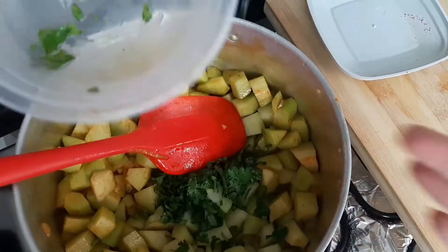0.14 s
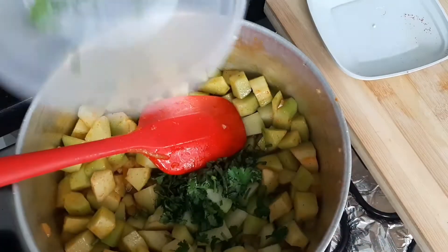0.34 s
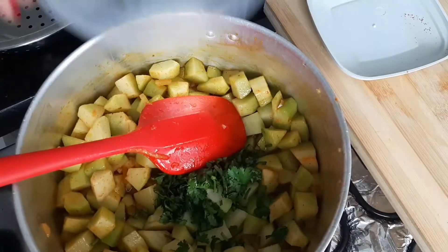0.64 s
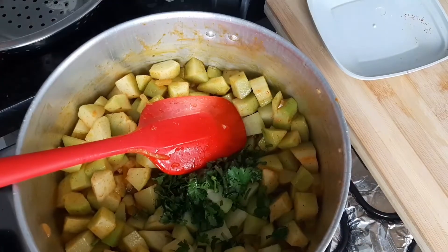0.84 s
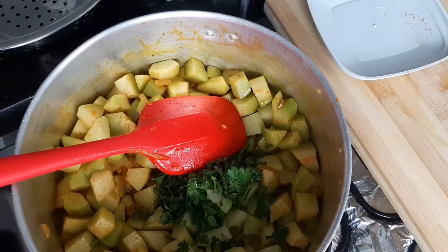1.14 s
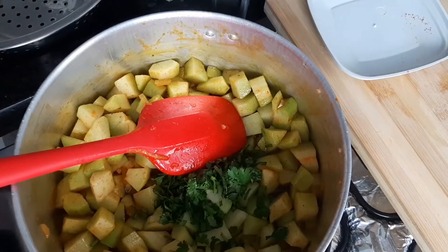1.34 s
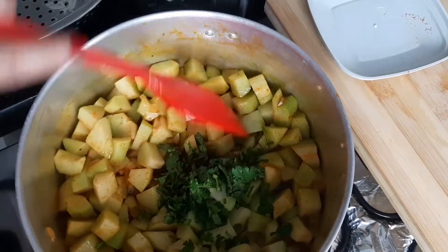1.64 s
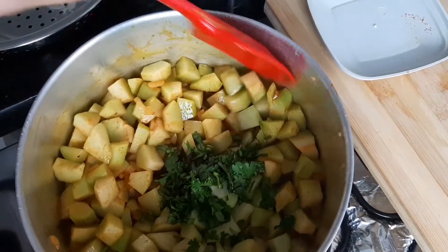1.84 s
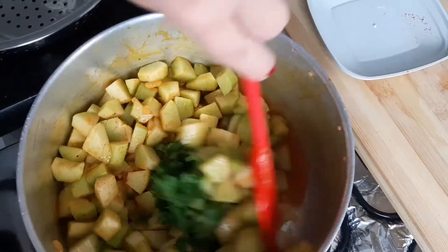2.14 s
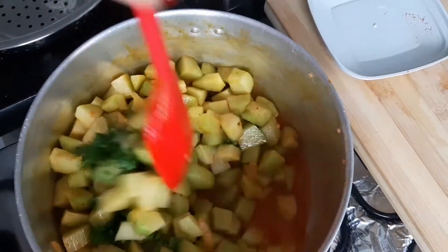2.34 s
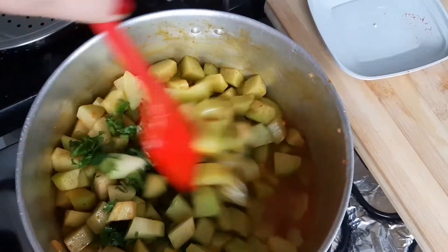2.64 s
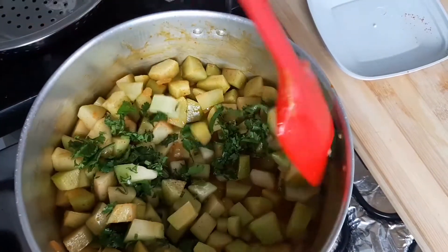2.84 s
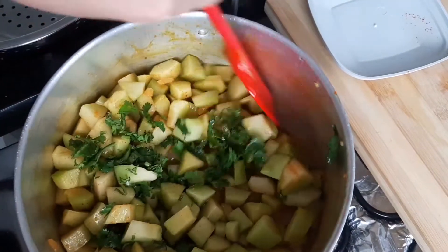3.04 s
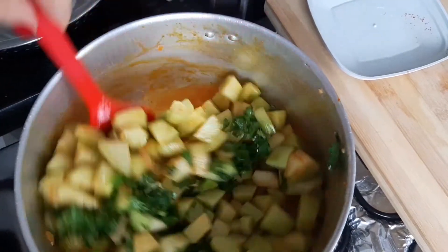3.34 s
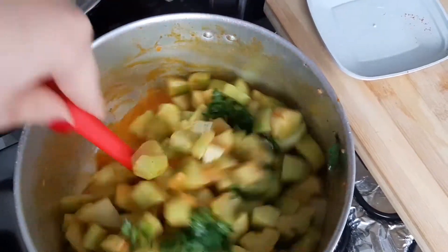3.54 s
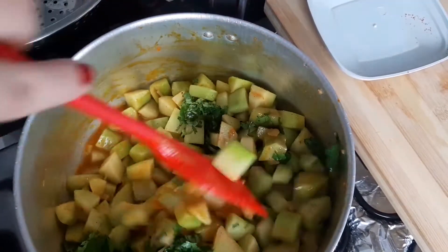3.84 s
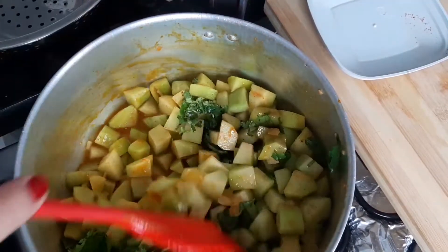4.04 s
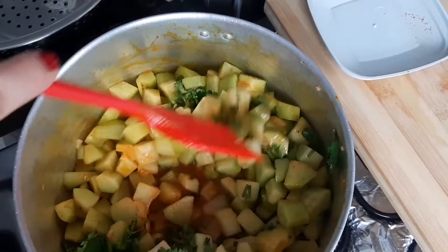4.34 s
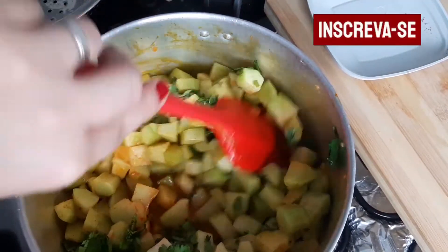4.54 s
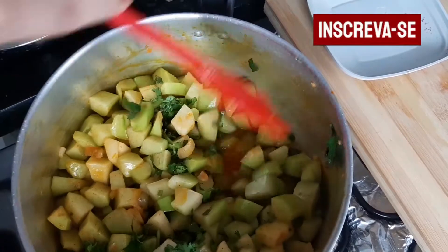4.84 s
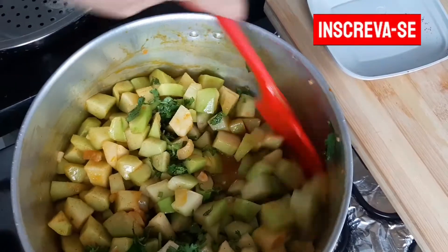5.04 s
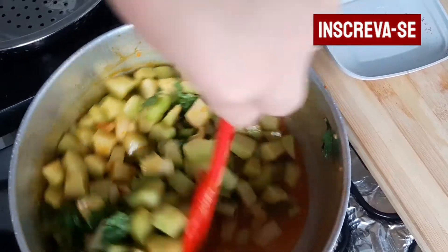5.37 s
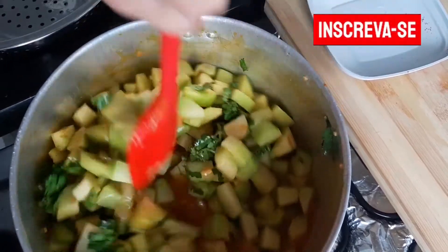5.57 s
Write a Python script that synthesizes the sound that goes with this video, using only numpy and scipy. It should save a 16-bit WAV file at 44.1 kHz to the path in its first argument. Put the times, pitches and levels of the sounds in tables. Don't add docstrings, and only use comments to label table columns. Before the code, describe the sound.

Close kitchen stirring: a plastic tub knocks down once, then moist chunks slosh and snap as a blade rubs the pot wall over low hum.

```python
import sys
import numpy as np
from scipy import signal
from scipy.fft import rfft, irfft
from scipy.io import wavfile

SR = 44100
rng = np.random.default_rng(int(sys.argv[2]) if len(sys.argv) > 2 else 0)


def transcribe(signal):
    frames = np.atleast_2d(signal).T
    limited = np.clip(frames, -1, 1)
    pcm = np.round(limited * 32767).astype(np.int16)
    wavfile.write(sys.argv[1], SR, pcm)


def how_loud(loudness_db):
    steps = np.asarray(loudness_db, float) / 20
    return 10 ** steps


N = 251704

# frequency in Hz, likeness (1 = identical).
PORT_LIKENESS = [(60, 0.94), (180, 0.97), (550, 0.84), (1650, -0.89), (4970, -4), (15000, 0.19)]


def rms_one(x):
    return x / np.sqrt(np.mean(x ** 2) + 1e-20)


def peak_one(x):
    return x / abs(x).max()


def in_time(rows):
    s, level = np.transpose(rows)
    return np.interp(np.arange(N) / SR, s, level)


def at_hz(points, hz):
    points_hz, values = np.transpose(points)
    return np.interp(np.log(hz), np.log(points_hz), values)


def band(x, low_hz, high_hz, order=2):
    edges_hz = [low_hz, min(high_hz, .45 * SR)]
    return signal.sosfilt(signal.butter(order, edges_hz, "band", fs=SR, output="sos"), x)


def drift(rate_hz):
    r = np.exp(-2 * np.pi * rate_hz * 40 / SR)
    noise = rng.standard_normal(N // 40 + 2002)
    slow = signal.lfilter([1], [1, -2 * r, r * r], noise)[2000:]
    return np.interp(np.arange(N) / 40, np.arange(len(slow)), rms_one(slow))


def ring(force, hz, t60_s):
    r, w = how_loud(-60 / (t60_s * SR)), 2 * np.pi * hz / SR
    return signal.lfilter([0, np.sin(w)], [1, -2 * r * np.cos(w), r * r], force + 1e-18)


def coloured(pair, spectrum):
    hz = np.maximum(np.arange(N // 2 + 1) * SR / N, 1)
    alike = np.clip(at_hz(PORT_LIKENESS, hz), 0, .99)
    mid, side = rfft(pair) * how_loud(at_hz(spectrum, hz)) * np.sqrt([1 + alike, 1 - alike])
    return rms_one(irfft([mid + side, mid - side], N))


def grains(per_s, spread_db):
    sizes_db = spread_db * np.minimum(rng.exponential(1, (2, N)), 5)
    signs = rng.choice([-1, 1], (2, N))
    return how_loud(sizes_db) * signs * (rng.random((2, N)) < per_s / SR)


def patches(per_s, low_hz, high_hz, cycles, patchy_db, spectrum):
    clicks, dealt = grains(per_s, spread_db=5.5), rng.integers(0, 16, N)
    out = np.zeros((2, N))
    for k, hz in enumerate(np.geomspace(low_hz, high_hz, 16)):
        gain = how_loud(at_hz(spectrum, hz) + patchy_db * drift(16))
        out += gain * ring(clicks * (dealt == k), hz, cycles / hz)
    return rms_one(out)


def swells(starts_s, lengths_s, levels_db, attack_s, release_s):
    t, power = np.arange(N) / SR, np.zeros(N)
    for s, length_s, level_db in zip(starts_s, lengths_s, levels_db):
        rise = np.maximum(s - t, 0) / attack_s
        fall = np.maximum(t - s - length_s, 0) / release_s
        power += how_loud(2 * level_db) * np.exp(-2 * (rise + fall))
    return np.sqrt(power)


def above(level_db, rest_db):
    return np.sqrt(np.maximum(how_loud(level_db) ** 2 - how_loud(rest_db) ** 2, 0))


def add(out, s, sound):
    i = round(s * SR)
    out[..., i:i + sound.shape[-1]] += sound[..., :N - i]


def hum():
    # frequency in Hz, level in dB per Hz.
    air_spectrum = [(35, -55), (50, -28), (90, -11.5), (150, -9.5), (250, -8), (500, -13), (800, -15),
                    (1050, -23), (2200, -30.5), (3200, -28.5), (7000, -31), (8200, -42.5), (12700, -40.5),
                    (15800, -43)]
    # frequency in Hz, width in Hz, level in dB.
    room_tones = [(269.3, 12.4, -61), (356.5, 4.2, -58.5), (420.5, 5.9, -64), (479.8, 44, -57.5),
                  (533.3, 5.5, -64), (641.8, 23, -64.5), (724, 18, -66.5), (12950, 74, -71),
                  (12400, 300, -77)]
    flicker = how_loud(.8 * drift(3))
    out = how_loud(-51.5 - 2.5) * flicker * coloured(rng.standard_normal((2, N)), air_spectrum)
    mains_hz, mains_db = 60.5, -71
    out += how_loud(mains_db) * np.sqrt(2) * np.sin(2 * np.pi * mains_hz * np.arange(N) / SR)
    for hz, width_hz, level_db in room_tones:
        alike = np.clip(at_hz(PORT_LIKENESS, hz), 0, .99)
        mid, side = ring(ring(rng.standard_normal((2, N)), hz, 3.5 / width_hz), hz, 0.43 / width_hz)
        tone = np.sqrt(1 + alike) * mid + np.sqrt(1 - alike) * side * [[1], [-1]]
        out += how_loud(level_db) * rms_one(tone)
    return out


def stirring():
    # time in seconds, level in dB.
    effort_curve = [(0, -71), (.45, -76), (.62, -65), (1.3, -68.5), (1.8, -65), (2.45, -64.5), (3.3, -60),
                    (3.62, -58.5), (3.84, -57.5), (3.92, -65), (4.45, -65.5), (4.6, -61), (4.85, -67.5),
                    (4.97, -61), (5.71, -60.5)]
    # time in seconds, level in dB.
    load_curve = [(0, -57), (.38, -67), (.55, -61), (1.0, -60.5), (1.3, -60), (1.9, -58), (2.35, -57.5),
                  (2.7, -54), (2.9, -55), (3.45, -56), (3.7, -55), (3.85, -57), (4.22, -60), (4.6, -50.5),
                  (4.75, -56), (5.12, -51.5), (5.25, -54.5), (5.71, -52.5)]
    # start in seconds, length in seconds, rub in dB, spray in dB re rub.
    sweeps = [(0.492, .012, -58.5, -11), (0.637, 0.089, -63, -9), (1.593, 0.014, -65, -9),
              (1.839, 0.047, -47.5, -11), (1.88, 0.01, -51, -2), (1.97, 0.016, -49, -12),
              (2.046, 0.032, -55.5, -4), (2.147, 0.013, -56, -3.5), (2.751, .012, -54.5, -6),
              (2.884, 0.068, -48, -11), (2.996, 0.021, -52.5, -5), (3.109, 0.12, -48.5, -9.5),
              (4.14, 0.01, -63, 5), (5.33, 0.024, -61, -1)]
    # start in seconds, length in seconds, level in dB.
    tumbles = [(0.01, 0.028, -57), (0.24, 0.033, -62), (.55, 0.18, -62), (1.878, 0.007, -44),
               (2.0, 0.05, -55), (2.308, 0.011, -64), (2.63, 0.022, -52), (2.744, 0.033, -50.5),
               (3.226, 0.15, -53.5), (3.44, 0.013, -55), (3.596, 0.14, -49.5), (4.106, 0.027, -54.5),
               (4.596, 0.086, -57), (5.146, 0.077, -53.5), (5.428, 0.09, -48.5), (5.642, 0.0092, -50.5)]
    # frequency in Hz, level in dB per Hz.
    rub_spectrum = [(2200, -44), (3000, -23), (3500, -2.5), (5000, 1), (7000, 1), (8000, 28.5), (9500, -19)]
    # frequency in Hz, level in dB per Hz.
    spray_spectrum = [(5000, 3.5), (7500, -8), (9000, 1.5), (13000, 7), (15750, -1.5), (16300, -30)]
    # frequency in Hz, level in dB.
    slosh_spectrum = [(500, 2.5), (900, 0), (1400, 0), (2600, 0.5)]

    effort, load_db = how_loud(in_time(effort_curve)), in_time(load_curve)
    s, length_s, rub_db, wet_db = np.transpose(sweeps)
    sweep_attack_s, sweep_release_s = 0.017, 0.016
    rub_swells = swells(s, length_s, rub_db, sweep_attack_s, sweep_release_s)
    spray_swells = swells(s, length_s, rub_db + wet_db, sweep_attack_s, sweep_release_s)
    tumble_swells = swells(*np.transpose(tumbles), attack_s=0.01, release_s=0.033)
    rubbing = np.hypot(effort, rub_swells)
    spraying = np.hypot(effort * how_loud(-3.5), spray_swells)
    tumbling = np.hypot(how_loud(load_db - 9.5), tumble_swells)

    rub_grains = patches(20000, 2900, 7200, cycles=115, patchy_db=3.3, spectrum=rub_spectrum)
    rub = rubbing * band(rub_grains, 2800, 9500)
    spray = spraying * how_loud(1.5 * drift(40)) * coloured(grains(6000, spread_db=2.5), spray_spectrum)
    slosh_grains = patches(1200, 484, 2965, cycles=62.0, patchy_db=-2.0, spectrum=slosh_spectrum)
    slosh = tumbling * how_loud(-3.5) * slosh_grains
    shove = how_loud(3.3 * drift(23)) * band(rng.standard_normal(N), 176, 296)
    return rub + spray + slosh + above(load_db, rest_db=-59.5) * rms_one(shove)


def ticks():
    # start in seconds, peak in dB, pitch in Hz, left-right in dB.
    pops = [(0.4907, -38, 5100, 2), (0.82, -43.5, 5300, -7), (1.979, -28, 3900, -5),
            (2.1499, -43.5, 2330, 8), (3.095, -45, 4200, 4), (3.3094, -31, 6400, -9),
            (3.6526, -36.5, 7040, -12), (3.7399, -33.5, 7200, -7), (4.2373, -40, 7000, -0.6),
            (4.5306, -25, 6230, 3), (4.9068, -39.5, 6840, 13), (4.954, -34.5, 6740, 13),
            (5.312, -43, 2090, 6), (5.5948, -38, 6150, 16.5), (5.6391, -40, 5040, 8)]
    # start in seconds, peak in dB, pitch in Hz, left-right in dB.
    snaps = [(0.1854, -54, 6940, -0.6), (1.5738, -42, 6350, 3), (1.881, -28, 3620, 2),
             (1.882, -25, 5400, 0.6), (2.029, -31.5, 7000, 8), (2.054, -41, 2350, 7),
             (2.0814, -34.5, 3550, 10), (2.2194, -43, 6890, 2), (2.7528, -35, 3330, -1),
             (2.767, -37.5, 4620, -2.5), (3.5304, -45, 4980, 0.6), (3.541, -34.5, 5300, 8),
             (3.5892, -39, 4700, 3), (3.6047, -31.5, 7000, 3), (3.8, -36, 5270, 5), (3.859, -35, 4900, 2),
             (4.4805, -44, 7000, 9), (4.576, -26, 6200, 3), (4.5765, -33, 2700, -5),
             (4.696, -36.5, 5800, 10), (5.091, -40, 3510, 0.6), (5.005, -38, 6340, 3.5),
             (5.1452, -24.5, 5600, 11), (5.1455, -29.5, 6800, 16), (5.147, -33, 10100, 20),
             (5.2834, -42, 4100, -15), (5.3368, -39.5, 5000, 3), (5.4001, -40, 2330, 23),
             (5.4835, -41, 2280, 5), (5.484, -34.5, 7140, 18)]
    # start in seconds, peak in dB, pitch in Hz, left-right in dB.
    bursts = [
        (2.0184, -49, 6600, 4),
        (0.4904, -50, 6000, 0.6),
        (2.0996, -48, 7380, -2),
        (3.3774, -41, 4330, -1),
        (3.7714, -44.5, 3300, 2),
        (4.1225, -50.5, 2340, -4),
        (4.7586, -50.5, 4060, 8),
        (4.9945, -43.5, 5140, 15),
        (5.46, -41, 6860, 4),
    ]
    # ring in cycles, broad snap in dB re ring, bright crack in dB re ring.
    kinds = [
        (20.4, -9, -14),
        (7.05, -8, -28),
        (12, -32, 9.5),
    ]
    # lag in seconds, level in dB.
    pot_echoes = [(.0009, -9), (.0017, -10), (.0029, -13), (.0046, -16)]

    out, t = np.zeros((2, N)), np.arange(1024) / SR
    click = 3 * (t == 0)
    rows = [row + kind for table, kind in zip((pops, snaps, bursts), kinds) for row in table]
    for s, peak_db, hz, pan_db, cycles, snap_db, crack_db in rows:
        a, b, c = rng.standard_normal((3, len(t)))
        kick = click + np.array([a + .5 * b, a + .5 * c]) * how_loud(-8 - 60 * t / .004)
        body = ring(ring(kick, hz, cycles / hz), hz, cycles / hz / 2)
        tear = click + np.array([a, .6 * a + .8 * b]) * how_loud(-9 - 60 * t / .005)
        snap = band(tear, .25 * hz, 7400, order=3)
        crack = band(np.array([c, b]) * how_loud(-60 * t / .007), 8000, 15900, order=3)
        sound = peak_one(body) + how_loud(snap_db) * peak_one(snap) + how_loud(crack_db) * peak_one(crack)
        pan = how_loud([[pan_db / 2], [-pan_db / 2]])
        add(out, s + 0.00097, how_loud(peak_db - 3.25) * sound * pan)
    echoes = sum(how_loud(echo_db) * np.roll(out[::-1], round(lag_s * SR), axis=1) for lag_s, echo_db in pot_echoes)
    return out + echoes


def knock():
    # start in seconds, peak in dB.
    touches = [
        (1.0387, -23),
        (1.0424, -5),
        (1.0471, -15.5),
        (1.0686, -28),
        (1.072, -27),
    ]
    # frequency in Hz, level in dB, t60 in seconds.
    tub_modes = [(201.4, -16.5, 0.67), (340, 1.5, 0.028), (510, -3, 0.022), (754, -8, 0.043),
                 (1012, -20, 0.055), (1257, -5, 0.14), (1270, -7, 0.039), (1473, -1, 0.085),
                 (1505, -6.5, 0.081), (2090, -9, 0.045), (3790, -7, 0.02), (4390, 0, 0.044),
                 (4620, 0, 0.033), (5860, -11, 0.03)]
    # frequency in Hz, level in dB per Hz.
    rattle_spectrum = [(120, -38), (220, -29), (350, 2.5), (1500, 4), (1800, -11.5), (3500, -6),
                       (4500, -5.5), (5500, -14), (7300, -13), (8200, -28.5), (15800, -21)]

    out, force, t = np.zeros((2, N)), np.zeros(N), np.arange(N) / SR
    for hz, level_db, t60_s in tub_modes:
        clicks = np.zeros((2, N))
        for s, peak_db in touches:
            at = s * SR + rng.integers(0, 24, 2)
            clicks[[0, 1], at.astype(int)] = how_loud(peak_db + level_db - 16.5 + rng.normal(0, 2.2))
        out += ring(clicks, hz, t60_s)
    for s, peak_db in touches:
        age_s = np.maximum(t - s, 0)
        onset = 1 - np.exp(-age_s / 0.00063)
        decay = how_loud(-14.5 - 60 * age_s / 0.033) + how_loud(-31.5 - 60 * age_s / 0.39)
        force += onset * how_loud(peak_db) * decay
    rattle = force * coloured(rng.standard_normal((2, N)), rattle_spectrum)
    return band(out + rattle, 260, 13500)


def thuds():
    # start in seconds, peak in dB, pitch in Hz, t60 in seconds.
    pushes = [(2.248, -56, 230, 0.04), (2.75, -34, 191, 0.18), (2.775, -29.5, 297, 0.032),
              (2.972, -41, 214, 0.043), (3.004, -42, 227, 0.15), (3.669, -42, 215, 0.086),
              (4.108, -38, 277, 0.017), (4.489, -42, 258, 0.1), (4.531, -46, 212, 0.075),
              (5.012, -35.5, 227, 0.042), (5.084, -35, 196, 0.054), (5.3, -60, 270, 0.064),
              (5.497, -41, 374, 0.071)]
    out = np.zeros(N)
    for s, peak_db, hz, t60_s in pushes:
        push = np.zeros(6000)
        push[:100] = np.hanning(100)
        floor = ring(push, hz, np.clip(t60_s, .01, .2))
        add(out, s, how_loud(peak_db) * peak_one(band(floor, 106, 1500)))
    return out


def grate():
    # centre in seconds, force in dB, half length in seconds, extra on long low bars in dB.
    slips = [(2.262, -47, 0.0047, -14), (2.277, -42, 0.0077, 6), (2.302, -48.5, 0.013, -5),
             (2.317, -49.5, 0.0046, 4), (2.344, -54, 0.0074, 0), (2.375, -57.5, 0.0076, 4.5),
             (2.408, -62, 0.0064, 2), (2.519, -56, 0.0052, -13), (2.528, -47, 0.0038, 3),
             (2.56, -54.5, 0.014, -2), (2.601, -61.5, 0.017, -1), (2.73, -81, 0.021, 18.5)]
    # frequency in Hz, level in dB per Hz.
    grit_spectrum = [(1800, -34), (2500, -2), (5000, -.6), (7500, -12), (8500, -10), (15800, -7)]
    bars_hz = (2600, 3095, 3150, 3978, 4820, 4862, 5222, 6315, 6934, 7574, 9130, 12640)
    # level in dB, t60 in seconds.
    bar_modes = [(-19, 0.057), (-.6, 0.045), (-0.8, 0.036), (-5, 0.036), (3, 0.037), (4, 0.084),
                 (-7, 0.052), (-9, 0.049), (-7, 0.068), (-10.5, 0.08), (-2, 0.038), (-4.5, 0.067)]

    t = np.arange(N) / SR
    rushes = np.array([how_loud(force_db) * np.exp(-((t - s) / half_s) ** 2) for s, force_db, half_s, _ in slips])
    force = rushes.sum(0)
    low_force = how_loud(np.array(slips)[:, 3]) @ rushes
    out = how_loud(-2) * force * coloured(rng.standard_normal((2, N)), grit_spectrum)
    for hz, (level_db, t60_s) in zip(bars_hz, bar_modes):
        drive = low_force if hz < 3500 else force
        shake = drive * np.cos(2 * np.pi * hz * t + 1.7 * drift(45))
        bar = how_loud(level_db - 40.0) * ring(shake, hz, t60_s)
        out += [np.roll(bar, rng.integers(0, 4)), bar]
    return out


def kitchen(x):
    # frequency in Hz, level in dB.
    wall_spectrum = [(100, -44), (200, 8.5), (5000, 4.5), (15800, -6.5)]
    t, t60_s = np.arange(N) / SR, 0.22
    tail = coloured(rng.standard_normal((2, N)), wall_spectrum) * how_loud(-60 * t / t60_s) * (t > .003)
    tail = tail[:, :SR // 2]
    tail = tail / np.sqrt((tail ** 2).sum(1, keepdims=True))
    return signal.fftconvolve(x, tail, axes=1)[:, :N]


def scene():
    tub, snaps, bars, soft = knock(), ticks(), grate(), thuds()
    to_room = how_loud(-8.5) * tub + how_loud(-11) * snaps + how_loud(-11) * bars
    return tub + snaps + bars + soft + kitchen(to_room) + stirring() + hum()


def roll_off(x):
    return signal.sosfilt(signal.butter(12, 15900, fs=SR, output="sos"), x)


def record(dry):
    low_pass = signal.cheby2(12, 60, 16500, fs=SR, output="sos")
    mix = signal.sosfilt(low_pass, dry)
    return roll_off(mix)


dry = scene()
out = record(dry)
transcribe(out)
```